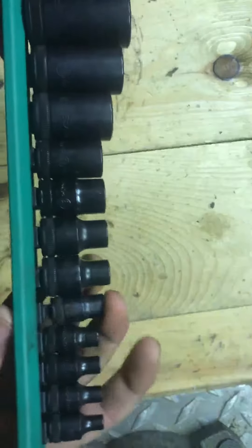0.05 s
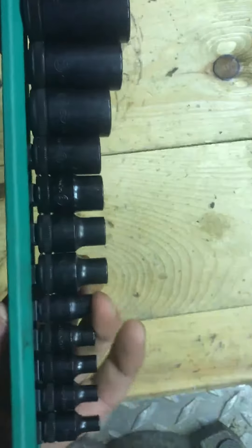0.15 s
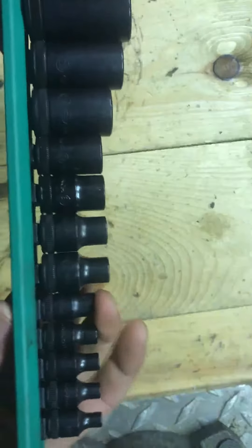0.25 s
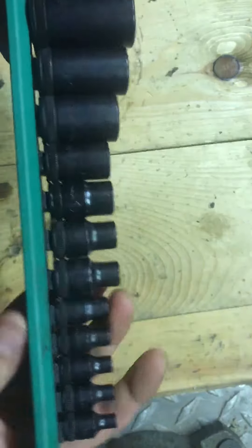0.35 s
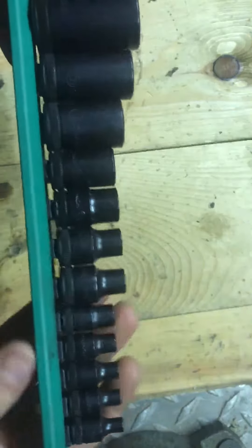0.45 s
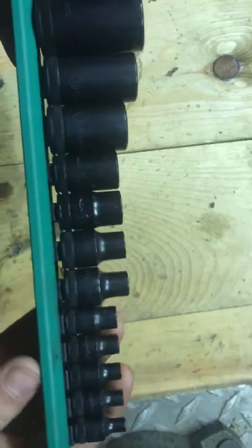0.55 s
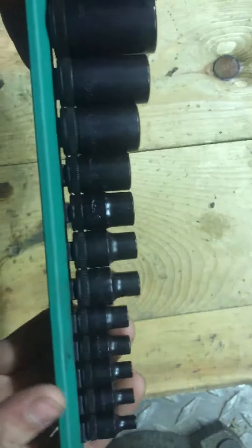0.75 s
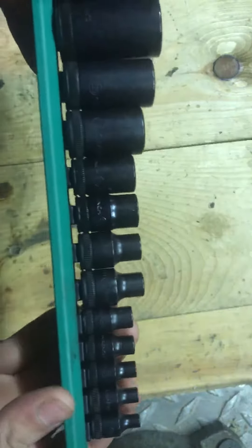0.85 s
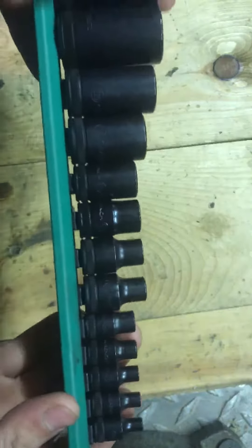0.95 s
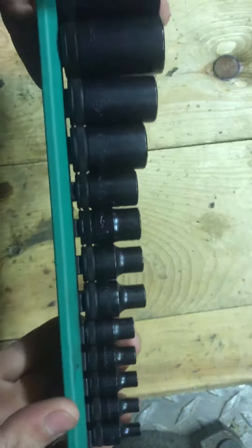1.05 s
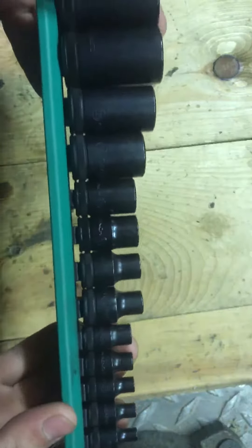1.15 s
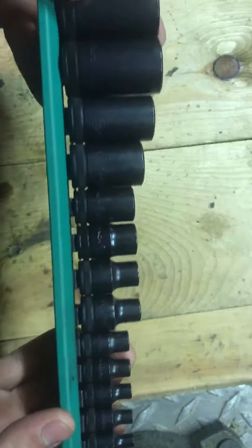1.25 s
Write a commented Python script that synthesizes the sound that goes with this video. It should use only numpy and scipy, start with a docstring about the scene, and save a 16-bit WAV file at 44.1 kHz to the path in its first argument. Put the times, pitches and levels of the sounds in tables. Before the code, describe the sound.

One sharp metallic click and a light tap from a handled rail of steel sockets.

```python
"""A rail of steel sockets, handled over a wooden bench in a small workshop, close to one microphone.
One socket snaps against its clip: a sharp crack, and the steel rings while its neighbours chatter.
A weaker tap, a few faint ticks and finger rubs follow, with echoes off the bench and a short room tail.
Behind the rail sit a low machine hum, mains buzz and a steady rush, coloured by the microphone.
The recorder's hiss gate opens on the clicks and dulls the treble in between."""
import sys
import numpy as np
from scipy import signal
from scipy.fft import rfft, irfft
from scipy.io import wavfile
from scipy.ndimage import uniform_filter1d

SR = 44100
rng = np.random.default_rng(int(sys.argv[2]) if len(sys.argv) > 2 else 0)


def file_out(sig):
    """Save sig as 16-bit WAV at sys.argv[1]."""
    # one column per channel
    cols = np.atleast_2d(sig).T
    # limit, then scale
    lim = np.clip(cols, -1, 1)
    pcm = np.round(lim * 32767).astype(np.int16)
    wavfile.write(sys.argv[1], SR, pcm)


N = 57330

# Steady background rush (frequency [Hz], density [dB per Hz])
RUSH_SPECTRUM = [(20, -84.5), (35, -79.5), (78, -78), (100, -87), (150, -89.5), (330, -88.5), (480, -87),
                 (680, -94), (880, -92.5), (1150, -95), (1500, -88), (1900, -99), (2150, -112),
                 (2600, -105), (3200, -102), (4500, -118), (16000, -135)]
# Microphone resonances that colour the background noise
# (frequency [Hz], half-width [Hz], peak density [dB per Hz])
MIC_RESONANCES = [(1530, 70, -91.5), (1757, 110, -82.5), (2611, 70, -90.5), (2841, 45.5, -89)]
# Course of the machine hum (time [s], relative level [dB], pitch [Hz])
HUM_COURSE = [(0.0, -62, 56), (0.06, -55, 57.8), (0.386, -62.5, 57.6), (0.484, -47.5, 55.1),
              (0.59, -61, 54.8), (0.694, -63.5, 58.1), (0.764, -54, 55.9), (0.894, -52.5, 56.65),
              (0.97, -50.5, 58), (1.01, -59, 57), (1.118, -56, 54.2), (1.3, -54, 53.1)]
# Mains buzz and fan whine (frequency [Hz], level [dB])
STEADY_TONES = [(119.8, -65.5), (240, -77.5), (358, -76), (2700, -71), (2880, -76)]
# Microphone hiss (frequency [Hz], density [dB per Hz])
MIC_HISS = [(1000, -108), (3500, -105), (6000, -106), (10000, -109), (15500, -107)]
# Echoes off the bench and hands (delay [s], gain [dB])
CLOSE_ECHOES = [(.0034, -12.5), (0.0124, -21.5)]
# Colour of the workshop's tail (frequency [Hz], gain [dB])
TAIL_SPECTRUM = [(200, -6), (650, -7.5), (1000, -16), (1500, -6.5), (1800, -16.5), (2200, -18),
                 (2500, -9.5), (2800, -12), (3300, -13.5), (3950, -9), (4700, -21.5), (5800, -16),
                 (6600, -15.5), (10000, -19), (16000, -13.5)]
# Decay of that tail (frequency [Hz], t60 [s])
TAIL_DECAY = [(200, 0.23), (1500, 0.13), (2800, 0.14), (3300, 0.15), (3950, 0.14), (4700, 0.14),
              (5600, .15), (8000, .13), (15000, 0.098)]
# Free ring of socket and rail (frequency [Hz], relative level [dB], t60 [s])
STEEL_MODES = [(628.4, -26.5, 0.06), (929, -28.5, 0.029), (1158, -14.5, 0.016), (1342, -26.5, 0.03),
               (1530, -19, .05), (1763, -2.5, .028), (2517, -12, .03), (2765, -12, .03), (2852, -20, .06),
               (1807, -29.5, 0.096), (2010, -24.5, .025), (2688, -14, 0.038), (3263, -16.5, 0.027),
               (3420, -20, .022), (3810, -17.5, .033), (4150, -30, 0.04), (4550, -18.5, .01),
               (5690, -23.5, .014), (6100, -27.5, 0.01)]
# Colour of the contact crack (frequency [Hz], relative level [dB])
CRACK_SPECTRUM = [(100, -11), (450, -20.5), (800, 1), (1100, 11), (1800, 7), (2200, -3), (3000, 4),
                  (4500, 2), (6500, 4.5), (7500, -10), (8600, -3), (10500, -15.5), (13500, -14.5),
                  (16000, -10)]
# Fingers sliding along the rail (time [s], length [s], level [dB])
FINGER_RUBS = [(.0, 0.055, -59), (0.446, 0.059, -60.5), (.52, 0.082, -61), (0.789, 0.13, -66.5)]
# Pings of the small sockets (time [s], frequency [Hz], level [dB], t60 [s])
SOCKET_PINGS = [(0.4125, 5200, -44.5, 0.021), (.4142, 3367, -39.5, .018), (0.413, 1260, -68, 0.0069),
                (0.4201, 1641, -37.5, 0.045)]
# Knocks on the clips (time [s], gain [dB], bass edge [Hz], treble edge [Hz], share of free ring [ratio])
SOCKET_KNOCKS = [(0.1838, -35, 1110, 5200, 0.43), (0.1943, -29.5, 1210, 3030, 0.32),
                 (0.2020, -35, 900, 6400, 0.7), (0.2059, 0.5, 794, 22000, 0.91),
                 (0.3826, -37.5, 1900, 3970, 0.35), (0.4142, -26.5, 1350, 5100, 0.48),
                 (0.4504, -33.5, 1990, 3400, 1), (0.4585, -40, 2200, 3600, 0.99),
                 (1.1113, -34.5, 900, 2930, 0.16), (1.1674, -47, 2000, 4510, .3)]
# Response of the closed hiss gate (frequency [Hz], gain [dB])
CLOSED_GATE = [(330, 0), (520, -7.5), (850, -1.5), (1800, -3), (2200, -7), (2900, -2.5), (4000, -10),
               (6000, -11), (10000, -10.5), (15500, -6.5)]


def amp(db):
    """Decibels to gain."""
    return 10 ** (np.asarray(db) / 20)


def read(points, hz):
    """Reads a table on a log-frequency axis."""
    f, value = np.transpose(points)
    return np.interp(np.log(hz + 1), np.log(f + 1), value)


def colour(x, gain):
    """Filters x by a gain that is a function of frequency."""
    return irfft(rfft(x) * gain(np.fft.rfftfreq(len(x), 1 / SR)), len(x))


def noise(gain):
    """Noise whose density per Hz follows gain."""
    return colour(rng.standard_normal(N), gain) * np.sqrt(SR / 2)


def causal(gain):
    """Minimum-phase impulse response with the given gains."""
    log_gain = np.log(np.maximum(np.r_[gain, gain[-2:0:-1]], 1e-5))
    return np.fft.ifft(np.exp(np.conj(signal.hilbert(log_gain)))).real


def add(mix, start_s, sound):
    """Mixes a sound in at a time."""
    part = mix[max(round(start_s * SR), 0):][:len(sound)]
    part += sound[:len(part)]


def background_rush(t, drift_db_per_s=-2):
    """Steady background rush, coloured by the microphone's resonances; it slowly grows fainter."""
    def density(f):
        peaks = [amp(db) / (1 + ((f - hz) / width) ** 2) for hz, width, db in MIC_RESONANCES]
        return np.sqrt(amp(read(RUSH_SPECTRUM, f)) ** 2 + sum(peak ** 2 for peak in peaks))
    return noise(density) * amp(drift_db_per_s * (t - t.mean()))


def machine_hum(t, trim_db=-2):
    """A machine's low tone, wavering in level and pitch."""
    times, level_db, pitch_hz = np.transpose(HUM_COURSE)
    phase = 2 * np.pi * np.cumsum(np.interp(t, times, pitch_hz)) / SR
    return np.sqrt(2) * amp(trim_db + np.interp(t, times, level_db)) * np.sin(phase)


def buzz_and_whine(t):
    """Steady tones: low ones from the mains, faint high ones from a fan."""
    return np.sqrt(2) * sum(amp(db) * np.sin(2 * np.pi * (hz * t + rng.random())) for hz, db in STEADY_TONES)


def microphone_hiss():
    """The microphone's own noise floor."""
    return noise(lambda hz: amp(read(MIC_HISS, hz)))


def workshop(direct, tail_delay_s=0.0046):
    """At the microphone: the direct sound, echoes off bench and hands, and a short diffuse tail."""
    hz, t, spectrum = signal.stft(rng.choice([-1., 1.], SR // 2), SR, nperseg=256)
    t60 = read(TAIL_DECAY, hz)[:, None]
    envelope = amp(read(TAIL_SPECTRUM, hz)[:, None] - 60 * t / t60)
    energy_scale = np.sqrt(2 * np.log(1000) / (t60 * SR))  # a longer decay adds no energy
    tail = signal.istft(spectrum * envelope * energy_scale, SR, nperseg=256)[1]
    out = direct.copy()
    add(out, tail_delay_s, signal.fftconvolve(direct, tail))
    for delay_s, db in CLOSE_ECHOES:
        add(out, delay_s, amp(db) * direct)
    return out


def mode(t, hz, db, t60, swell_cycles=0.62):
    """One resonance of the steel that swells quickly and dies away."""
    swell = 1 - np.exp(-(t * hz / swell_cycles) ** 2)
    return swell * amp(db - 60 * t / t60) * np.sin(2 * np.pi * hz * t)


def finger_rub(length_s, level_db, slips_per_s=1500):
    """Tiny slips under a finger each excite the steel like a damped knock."""
    count = round(length_s * SR)
    slips = (rng.random(N) < slips_per_s / SR) * rng.standard_normal(N)
    stroke = slips[:count] * signal.windows.tukey(count, .5)
    sound = signal.fftconvolve(stroke, socket_knock(0, bass_hz=1500, treble_hz=4500, ring_share=0.66))
    return amp(level_db) * sound / (np.std(sound[:count]) + 1e-12)


def socket_knock(gain_db, bass_hz, treble_hz, ring_share):
    """Steel meets its clip: a crack, a little chatter, and modes that ring unless a finger damps them."""
    crack_db, crack_t60_s = -6, 0.0049
    chatter_db, free_chatter_t60_s = -21.5, .05  # neighbouring sockets buzz on their clips
    t = np.arange(SR // 4) / SR
    hz = np.fft.rfftfreq(1024, 1 / SR)
    ring = sum(mode(t, mode_hz, db, t60 * ring_share) for mode_hz, db, t60 in STEEL_MODES)
    crack = amp(crack_db - 60 * t / crack_t60_s)
    chatter = amp(chatter_db - 60 * t / (free_chatter_t60_s * ring_share))
    grit = (crack + chatter) * rng.choice([-1., 1.], len(t))
    tone = amp(read(CRACK_SPECTRUM, hz))
    tone /= np.sqrt(np.mean(tone ** 2))
    contact = signal.fftconvolve(grit, causal(tone))[:len(t)]
    high_pass = hz ** 2 / np.hypot(hz ** 2, bass_hz ** 2)
    low_pass = 1 / np.hypot(1, (hz / treble_hz) ** 3)
    return amp(gain_db) * signal.fftconvolve(ring + contact, causal(high_pass * low_pass))


def socket_rail():
    """The rail in the hand: sockets knock and ping, fingers rub along the steel."""
    out = np.zeros(N)
    for start_s, *knock in SOCKET_KNOCKS:
        add(out, start_s, socket_knock(*knock))
    for start_s, *ping in SOCKET_PINGS:
        add(out, start_s, mode(np.arange(SR // 10) / SR, *ping))
    for start_s, *rub in FINGER_RUBS:
        add(out, start_s, finger_rub(*rub))
    return out


def scene():
    """Mono, at the bench: the rail up close, the workshop's room tone behind it."""
    t = np.arange(N) / SR
    rail = workshop(socket_rail())
    room_tone = background_rush(t) + machine_hum(t) + buzz_and_whine(t)
    return (rail + room_tone + microphone_hiss())[None]


def hiss_gate(x, threshold_db=-46, hold_s=0.201, fade_s=0.011):
    """The recorder dulls the treble unless a sharp sound has crossed the threshold within the hold time."""
    treble = signal.sosfilt(signal.butter(4, 3500, "high", fs=SR, output="sos"), x)
    loud = uniform_filter1d(treble ** 2, size=64) > amp(threshold_db) ** 2
    t = np.arange(N) / SR
    since_loud_s = t - np.maximum.accumulate(np.where(loud, t, -1))
    opened = uniform_filter1d(1. * (since_loud_s < hold_s), round(fade_s * SR))
    dulled = colour(x, lambda hz: amp(read(CLOSED_GATE, hz)))
    return opened * x + (1 - opened) * dulled


def record(dry):
    """The recorder: hiss gate, clipping at full scale, then a 16.1 kHz band limit."""
    clipped = np.clip(hiss_gate(dry[0]), -1, 1)
    low_pass = signal.firwin(255, 16100, window=("kaiser", 9), fs=SR)
    return signal.oaconvolve(clipped, low_pass, "same")[None]


dry = scene()
out = record(dry)
file_out(out)
```